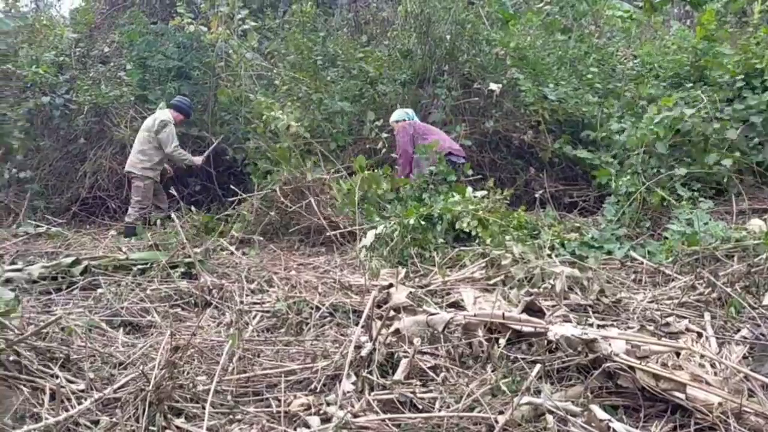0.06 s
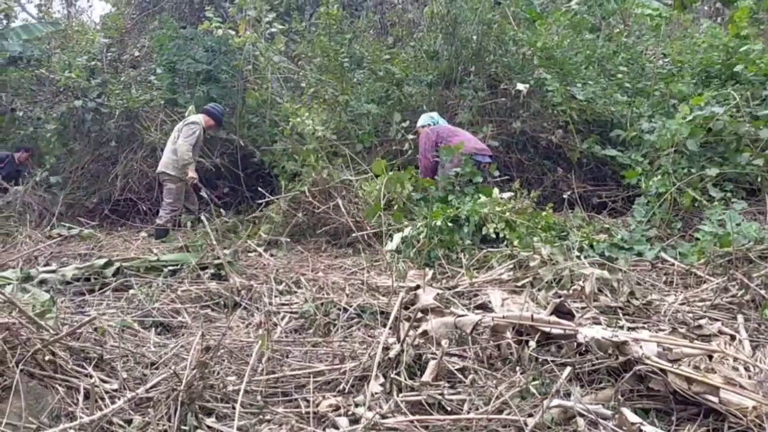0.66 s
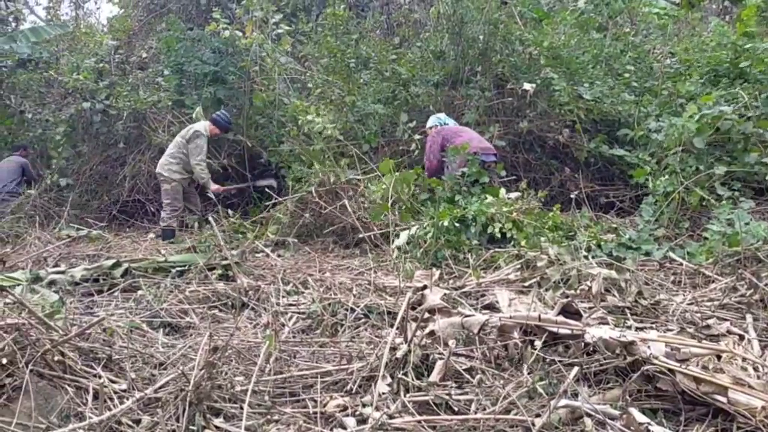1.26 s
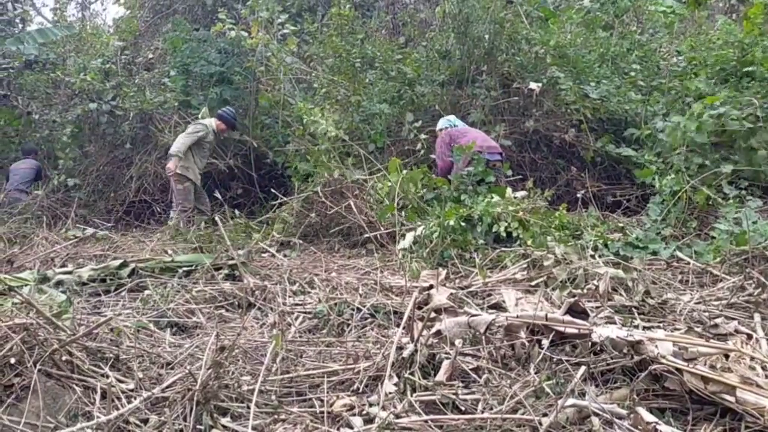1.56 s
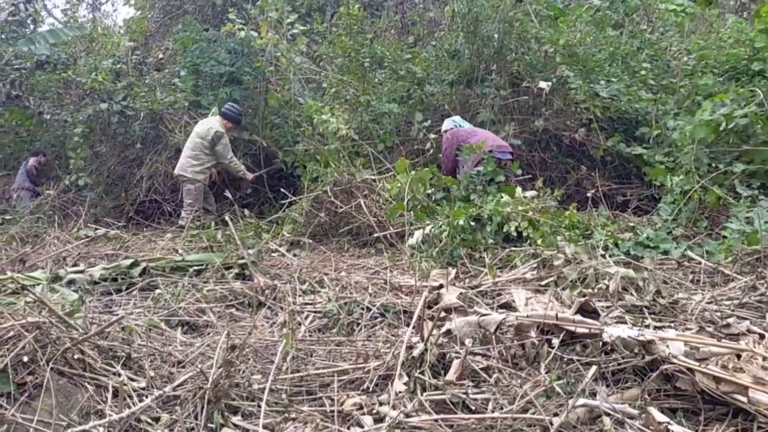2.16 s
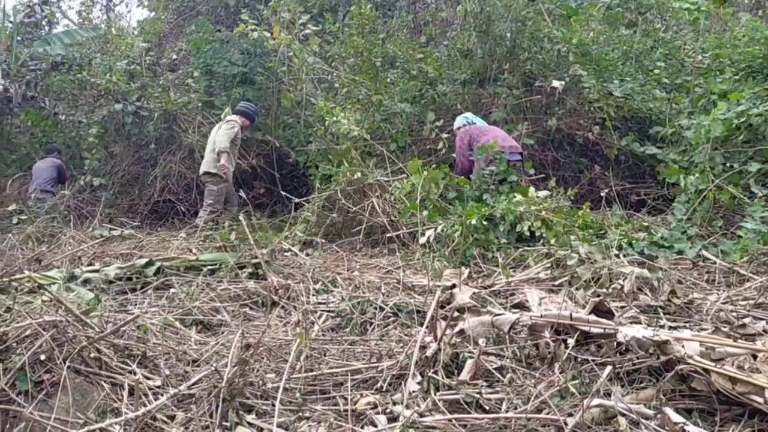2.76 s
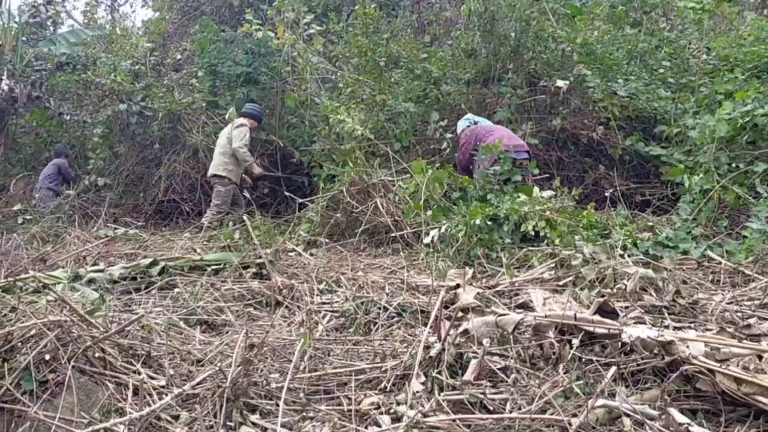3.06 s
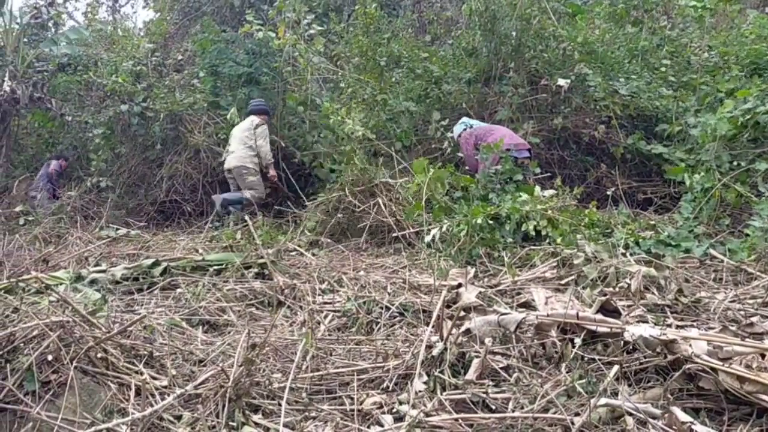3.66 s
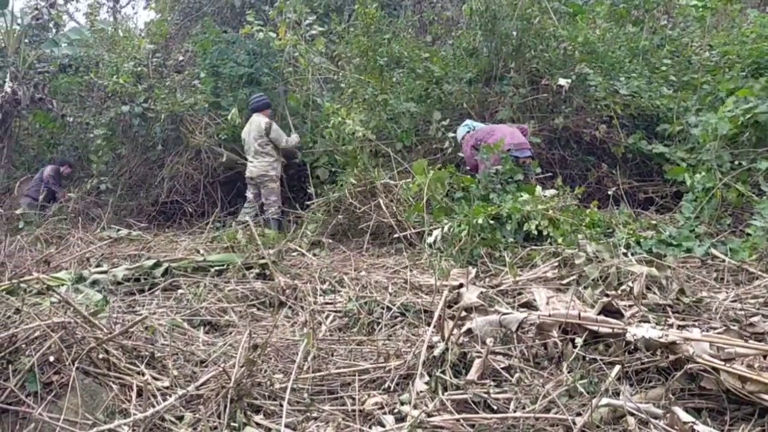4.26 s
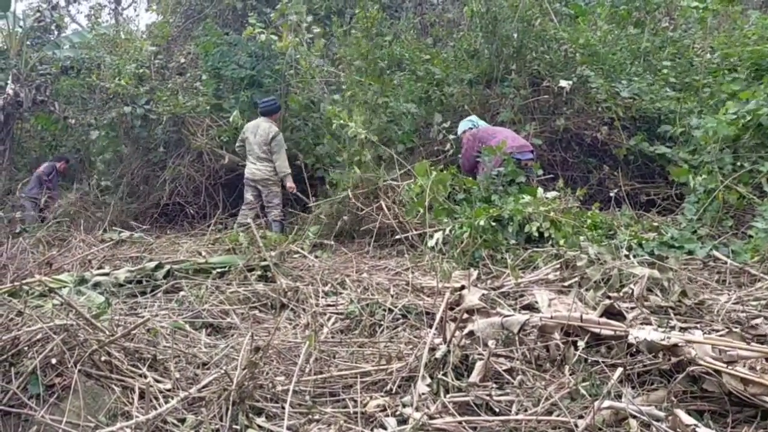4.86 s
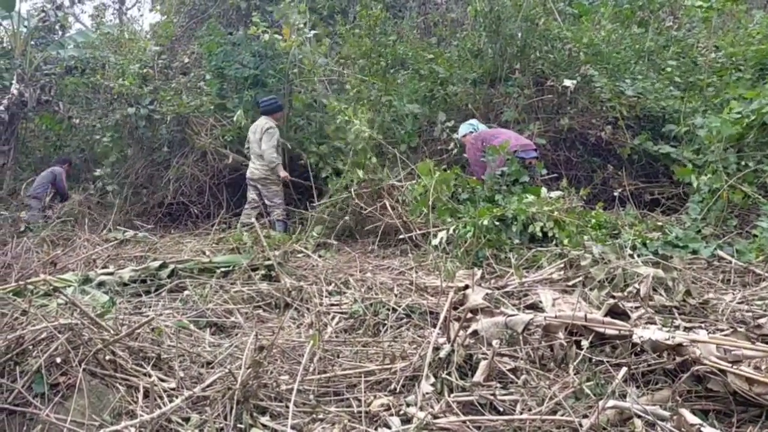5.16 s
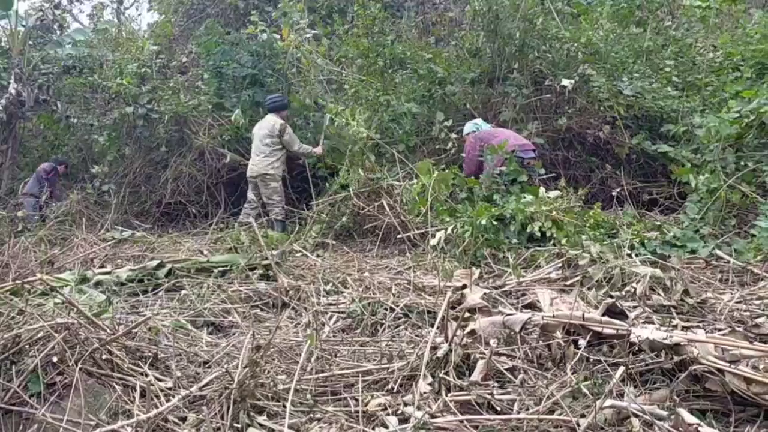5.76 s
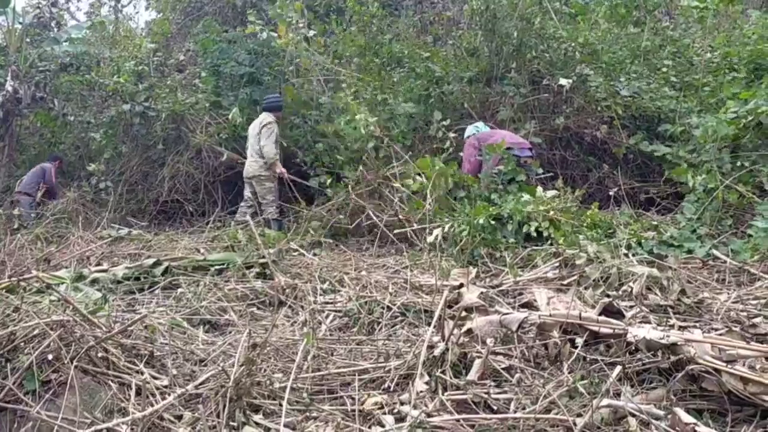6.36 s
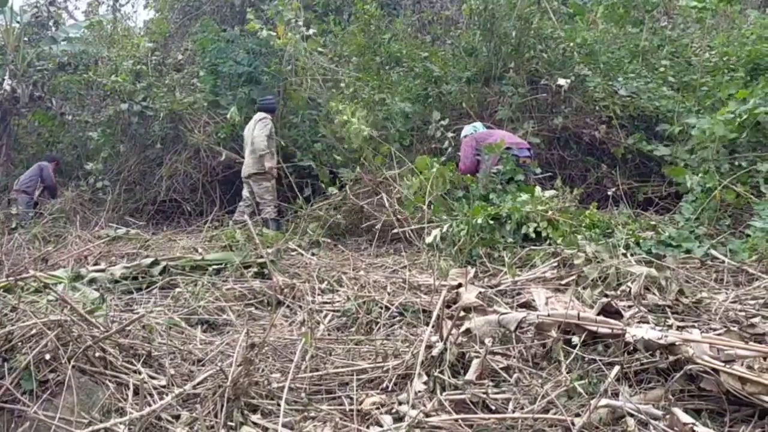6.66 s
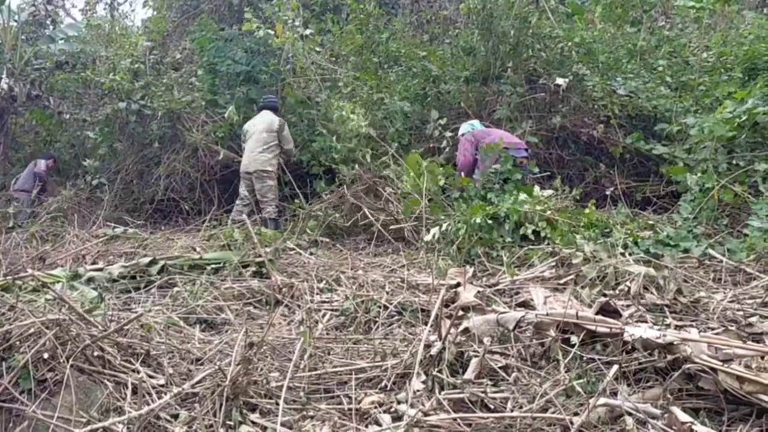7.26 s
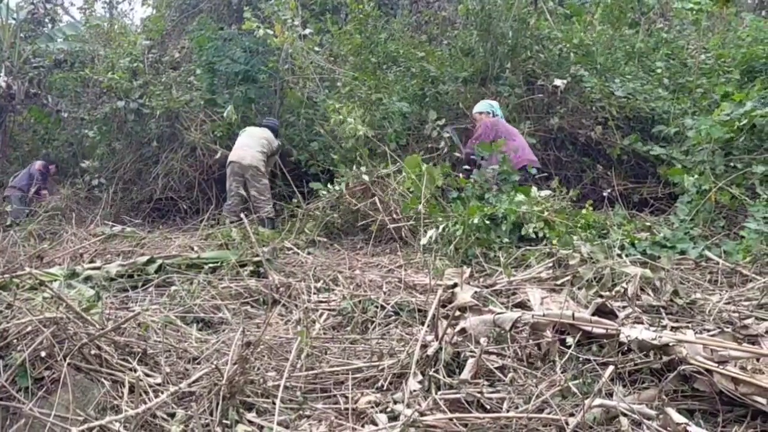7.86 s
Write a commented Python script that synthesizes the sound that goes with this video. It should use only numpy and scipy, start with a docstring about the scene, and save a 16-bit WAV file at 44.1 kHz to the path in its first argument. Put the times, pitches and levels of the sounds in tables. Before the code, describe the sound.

People clear brush with hand blades some metres away on a wooded slope. Irregular strokes knock into woody stems and tear through leaves, with sharp twig snaps and the rustle of dragged branches between them. A light gust passes early, and a bird gives one brief whistle. In the last third, stronger wind rumbles and thumps on the microphone while the chopping continues.

```python
"""People clear a hillside with hand blades, some metres away. From the start, swings knock into woody
stems and tear through leaves; twigs snap, cut brush is dragged aside, and the wooded slope echoes faintly.
A light gust passes at 1.2 s. At 3 s a bird whistles once. From 5.6 s stronger gusts buffet the microphone
as the work goes on. The microphone overloads on the hardest blows."""
import sys
import numpy as np
from scipy import signal
from scipy.fft import rfft, irfft, next_fast_len
from scipy.io import wavfile

SR = 44100
rng = np.random.default_rng(int(sys.argv[2]) if len(sys.argv) > 2 else 0)


def persist_wave(psi):
    """Save psi, clipped to +-1, as 16-bit WAV."""
    counts = np.round(np.clip(psi, -1, 1) * 32767).astype(np.int16)
    wavfile.write(sys.argv[1], SR, np.atleast_2d(counts).T)


N = 353682
TIME = np.arange(N) / SR

# Spectra of cracking wood and dry leaves. Each row: frequency in Hz, density in dB.
WOOD_SPECTRUM = [(40, -20), (170, -9), (300, -18.5), (450, -19.5), (600, -11), (850, -11.5), (1200, -6),
                 (1550, -3.5), (1790, 1.5), (2000, 0), (2230, -0.5), (2800, -9), (5000, -17.5),
                 (16000, -33.5)]
LEAF_SPECTRUM = [(100, -11.5), (600, -18), (1500, -19), (3500, 1.5), (8000, -3), (16000, 1)]


def strokes(settle_db=-14, settle_db_per_s=65, notch_hz=4100, sheen_octaves=0.36):
    """Fibres tear while the blade passes; then the shaken bush settles."""
    # Each row: start in seconds, stem level in dB, leaves re stems in dB, rise in seconds,
    # length in seconds, foliage sheen in Hz, its boost in dB, ground bounce from 0 to 1.
    cuts = [(.004, -34.5, 9, 0.0024, 0.004, 13000, 12, 0.3), (.108, -22, 4.5, .0025, 0.0043, 11000, -3, 0),
            (.138, -24.5, 6, 0.0076, 0.014, 9000, -2, 0.23), (.433, -18.5, 1, 0.0076, 0.024, 13000, 1.5, 0),
            (1.408, -22.5, 2, 0.0038, 0.014, 13000, -2, 0), (1.427, -18, -1, 0.0018, 0.018, 14200, 6, 0.1),
            (1.583, -26.5, -1, 0.0039, 0.0078, 7000, 0, .83),
            (1.596, -25, 4.5, .006, 0.048, 7000, -3, 0.54), (1.857, -19.5, -6.5, 0.019, 0.026, 8000, 7, 0),
            (1.881, -14, 0.5, 0.007, 0.013, 7100, 3, 0), (2.414, -14.5, -2.5, 0.013, 0.055, 13000, 5, 0),
            (2.78, -37, -7.5, 0.064, 0.13, 7100, 8.5, 0.68), (3.223, -17.5, 2, .003, 0.027, 4500, 1, 0.1),
            (3.347, -31.5, 9.5, 0.0066, .018, 7600, -1.5, 0.2), (3.428, -22, -1, 0.0032, .018, 5800, -2, 0),
            (3.443, -26, -3, .005, .032, 14900, 11.5, .03),
            (4.253, -16.5, -5, 0.0084, 0.031, 7000, 1.5, 0.31), (4.67, -22.5, -1, 0.011, 0.09, 15500, 5, 0),
            (4.775, -25.5, 0, 0.0034, 0.091, 15000, 3, 0),
            (5.221, -17.5, -1.5, 0.0036, 0.018, 14000, 4, 0.1),
            (5.996, -22.5, 3.5, 0.0049, 0.11, 15000, 7.5, .1),
            (6.335, -18.5, 3, 0.0055, 0.016, 6760, -1, 0.62),
            (6.954, -21.5, -5.5, .011, 0.022, 15000, 1, .16), (7.31, -42.5, 3, .024, 0.12, 7100, 1.5, 0.68),
            (7.952, -41, 17.5, .0085, .017, 15000, 7, .1)]
    # Thick stalks that only low cuts reach. Each row: centre in Hz, width in octaves, dB at bounce 1.
    stalks = [(776, 0.9, 10.5), (2570, 0.18, 18), (5900, 0.082, 14)]
    clumps = unit(amp(2 * wander(rate_hz=110)))
    stems = amp(-3.5) * colour(clumps * crackle(per_s=1800, spread_db=3, hiss_db=-1), WOOD_SPECTRUM)
    leaves = amp(-1.5) * colour(clumps * crackle(per_s=6000, spread_db=4.5, hiss_db=2.5), LEAF_SPECTRUM)
    out = np.zeros(N)
    t = np.arange(SR) / SR
    for start_s, db, leaf_db, rise_s, length_s, sheen_hz, sheen_db, bounce in cuts:
        after_s = np.maximum(t - length_s, 0)
        fade_db_per_s = 198 * (0.025 / length_s) ** 0.37  # longer cuts shake more brush, die more slowly
        settling = amp(settle_db - settle_db_per_s * after_s)
        envelope = np.minimum(t / rise_s, 1) * np.hypot(amp(-fade_db_per_s * after_s), settling)
        span = (round(start_s * SR) + np.arange(SR)) % N
        tear = stems[span] + amp(leaf_db) * leaves[span]
        tear = tint(tear, lambda f: amp(sheen_db * hump(f, sheen_hz, sheen_octaves)))
        # the delayed ground bounce hollows the upper middle
        tear = tint(tear, lambda f: (1 + bounce * np.exp(-1j * np.pi * f / notch_hz)) / np.hypot(1, bounce))
        tear = tint(tear, lambda f: amp(bounce * sum(boost_db * hump(f, hz, octaves)
                                                     for hz, octaves, boost_db in stalks)))
        add(out, start_s, amp(db) * envelope * tear)
    return out


def chops(contact_s=0.00066, graze_db=-13, graze_s=0.0016):
    """A blow swells over the contact time and rings a thick stem's damped modes; the edge grazes bark."""
    # Each row: start in seconds, relative level in dB, stem pitch in Hz, t60 in seconds.
    blows = [(0.111, -2.5, 1625, 0.018), (0.113, 0, 2160, 0.018), (0.143, -11.5, 1856, 0.045),
             (0.439, -2, 1640, 0.0097), (0.451, -11, 1800, 0.029), (0.464, -13, 1734, 0.077),
             (0.501, -11, 1740, 0.03), (0.918, -17.5, 1890, 0.036), (1.426, -16, 1374, 0.045),
             (1.436, -2.5, 1230, 0.01), (1.605, -12, 2040, 0.08), (1.863, -14, 1850, 0.094),
             (1.882, -8.5, 1740, 0.034), (2.354, -20, 1247, 0.061), (2.356, -15.5, 2110, 0.035),
             (2.419, -12.5, 2165, 0.12), (2.443, -10.5, 1710, 0.039), (3.228, 4, 1838, 0.023),
             (3.357, -16, 1820, 0.03), (3.456, -15, 1690, 0.088), (3.46, -23, 716, 0.074),
             (4.264, -21, 2170, .028), (4.701, -12, 2090, 0.028), (4.704, -4.5, 1130, 0.0075),
             (5.22, -11, 2110, 0.02), (5.486, -33, 1803, 0.2), (5.523, -26.5, 1770, 0.051),
             (5.978, -6.5, 2100, 0.017), (6.338, -12, 2445, 0.014), (7.722, -31, 1840, 0.096)]
    # Each row: nominal multiple of the pitch, level in dB, factor on t60.
    stem_modes = [(.6, -17, 0.88), (.75, -15.5, 0.83), (0.999, -1.5, 1), (1.016, -23.5, 6.3),
                  (1.2, -25, 0.6), (1.55, -9, 0.38), (2.25, -11, 0.33)]
    rings, bark = np.zeros((2, N))
    t = np.arange(SR // 4) / SR
    for start_s, db, hz, t60_s in blows:
        stretch = rng.uniform(.88, 1.12)  # no two stems space their modes alike
        ring = np.zeros(len(t))
        for ratio, mode_db, t60_factor in stem_modes:
            decay = amp(mode_db - 60 * t / (t60_s * t60_factor))
            ring += decay * np.sin(2 * np.pi * (hz * ratio ** stretch * t + rng.random()))
        blow = amp(db + 3.5) * (1 - np.exp(-t / contact_s))
        graze = amp(graze_db) * np.exp(-t / graze_s) * rng.standard_normal(len(t))
        add(rings, start_s, blow * ring)
        add(bark, start_s, blow * graze)
    return rings + colour(bark, WOOD_SPECTRUM)


def snaps(rise_s=0.00091, split_s=0.0014, scatter_db=-19, scatter_s=0.022, skirt_db=-6):
    """A twig splits in milliseconds, shriller the thinner it is; nearby stems scatter the crack."""
    # Each row: start in seconds, relative crack level in dB, pitch in Hz, wood re crack in dB.
    twigs = [(0.0595, -19.5, 10700, -15), (0.114, -3, 10600, -19), (0.124, -16, 14200, -16.5),
             (0.1534, -3, 9300, -20), (0.453, -3, 12100, -1), (0.5, -15.5, 10600, 4),
             (0.5938, -15, 8400, -16), (0.648, -18.5, 12200, -25), (0.704, -22, 7760, -46),
             (1.256, -23.5, 11700, 4.5), (1.328, -16.5, 11500, -10), (1.428, -12, 5400, -18),
             (1.4441, -5, 13100, -24), (1.885, -0.5, 7560, -12), (3.206, -20.5, 12500, -6),
             (3.227, -5.5, 4250, -30), (3.268, -18, 6900, -10), (3.357, -5, 7750, -28),
             (3.504, -19, 13000, 5.5), (3.952, -26.5, 11800, -15), (4.0754, -20, 12200, -2.5),
             (4.173, -17.5, 9400, -1.5), (4.3616, -15, 8640, -15), (4.4301, -8.5, 12200, -22),
             (4.476, -9.5, 11700, -25), (4.5055, -10.5, 9200, -22), (4.655, -26, 10000, 11),
             (4.7003, -14, 10800, 5.5), (4.7408, -16.5, 11600, 3), (4.7786, 1, 11900, -22),
             (4.782, -10, 12500, -3), (5.0285, -22, 9700, -12), (5.187, -16.5, 9550, -11),
             (5.2186, -22, 3800, 14.5), (5.368, -40, 5000, 14), (5.933, -30, 5000, 11),
             (5.9776, -27, 9000, 9), (6.0054, -5, 10700, -3.5), (6.061, -10, 11300, -4),
             (6.09, -4, 10900, -24), (6.119, -1, 14200, -30), (6.156, -2.5, 11300, -14),
             (6.2517, -24, 7900, 4.5), (6.3733, -4.5, 8500, -7), (6.3904, -1.5, 7340, -24),
             (6.96, -3, 11700, -22), (7.109, -21.5, 10400, -2), (7.552, -36.5, 5400, -13),
             (7.6186, -48, 5530, 17), (7.963, -14, 12000, -18)]
    wood, cracks = np.zeros((2, N))
    t = np.arange(SR // 10) / SR
    envelope = np.minimum(t / rise_s, 1) * (np.exp(-t / split_s) + amp(scatter_db) * np.exp(-t / scatter_s))
    for start_s, db, hz, wood_db in twigs:
        fibres = rng.standard_normal(len(t))
        crack = envelope * unit(tint(fibres, lambda f: amp(skirt_db) + hump(f, hz, octaves=0.41)))
        crack *= np.linalg.norm(envelope) / np.linalg.norm(crack)
        gain = amp(db + 2.5)
        add(wood, start_s, gain * amp(wood_db) * envelope * fibres)
        add(cracks, start_s, gain * crack)
    return colour(wood, WOOD_SPECTRUM) + colour(cracks, LEAF_SPECTRUM)


def rustle(ring_db=-10.5):
    """Dragged or trodden branches scrape, ring and crackle in clumps; a few dry sticks crack."""
    # Each row: start and length in seconds, relative stem level in dB, leaf offset in dB, pitch in Hz.
    pulls = [(0, 0.075, -34.5, -12, 2120), (.21, 0.058, -28.5, 5.5, 1890), (0.497, 0.81, -38, 3.5, 1840),
             (0.89, 0.071, -39, 10.5, 1830), (1.473, 0.3, -31.5, 1.5, 2100), (2.0, 0.38, -37.5, 2.5, 1980),
             (2.607, 0.29, -37, 4, 2230), (3.49, 0.049, -27.5, 6.5, 2070), (3.665, 0.78, -45.5, 7.5, 1950),
             (4.051, 0.35, -34, 6, 2200), (4.267, 0.32, -27, 7, 2110), (4.624, .2, -29.5, -6, 1780),
             (4.952, 0.25, -33, 1, 2230), (5.47, 0.17, -40.5, 3, 1840), (5.65, 0.42, -35.5, 6, 1800),
             (5.905, 0.18, -26.5, 1.5, 2110), (6.23, 0.25, -37, 2, 2110), (6.71, 0.25, -40, 3, 2180),
             (6.893, 0.13, -30, 4.5, 2000), (7.263, 0.11, -36, 1, 2180), (7.73, 0.16, -40, 5.5, 1900),
             (7.863, 0.062, -25.5, 5, 1880)]
    clumps = unit(amp(1.63 * wander(rate_hz=24)))
    sticks = crackle(per_s=45, spread_db=2.5, hiss_db=-35)
    stems = clumps * crackle(per_s=900, spread_db=0.5, hiss_db=5.5) + amp(-9) * sticks
    leaves = clumps * crackle(per_s=3000, spread_db=-2, hiss_db=-3) + amp(-13.5) * sticks
    scrape = crackle(per_s=580, spread_db=2, hiss_db=-1.5)
    stem_power, leaf_power = amp(-43) ** 2, amp(-53) ** 2  # the brush never quite rests
    rings = np.zeros(N)
    for start_s, length_s, db, leaf_db, hz in pulls:
        pull = amp(db) * swell(start_s, length_s, rise_s=0.044, fall_db_per_s=90)
        stem_power += pull ** 2
        leaf_power += (amp(leaf_db) * pull) ** 2
        rings += amp(ring_db) * pull * resonate(scrape, hz, width_hz=170)
    stems = amp(-3) * np.sqrt(stem_power) * colour(stems, WOOD_SPECTRUM)
    leaves = amp(-6) * np.sqrt(leaf_power) * colour(leaves, LEAF_SPECTRUM)
    return rings + stems + leaves


def wind(breeze_db=-52):
    """Eddies at the microphone: a rumble that swells in gusts, with harder buffets in strong ones."""
    # Each row: start and length in seconds, relative level in dB, buffet offset in dB.
    gusts = [(1.2, 0.76, -33.5, -21), (5.64, 0.12, -32.5, -32), (5.784, 0.54, -23.5, -21),
             (5.998, 0.075, -15, -14), (6.445, 1.073, -21.5, -18), (6.878, 0.28, -15, -3),
             (7.707, 0.35, -20.5, -22)]
    # Each row of both: frequency in Hz, density in dB.
    rumble_spectrum = [(10, -1.5), (25, -3), (50, 0.5), (85, -3.5), (125, -12), (200, -23), (400, -83),
                       (900, -74)]
    buffet_spectrum = [(40, -10), (100, -5.5), (160, 3), (220, -2), (350, -14.5), (600, -36), (1500, -65)]
    rumble, buffets = noise(rumble_spectrum), noise(buffet_spectrum)
    turbulence = unit(amp(3.7 * wander(rate_hz=25)))
    out = amp(breeze_db + 1.7 * wander(rate_hz=2.4)) * rumble
    for start_s, length_s, db, buffet_db in gusts:
        gust = amp(db) * swell(start_s, length_s, rise_s=0.025, fall_db_per_s=226)
        out += gust * turbulence * (amp(-1.9) * rumble + amp(buffet_db - 6.5) * buffets)
    return out


def thumps(width_cycles=0.43):
    """A single eddy slaps the microphone: one short push and pull of pressure."""
    # Each row: centre in seconds, peak in dB, pitch in Hz.
    eddies = [(1.512, -19, 124), (1.635, -18, 50), (1.898, -19, 80), (5.831, -16, 70), (6.26, -8.5, 50.4),
              (6.499, -8, 41.5), (6.929, -9, 173), (7.121, -7, 120), (7.154, -1.5, 128), (7.407, -14, 101),
              (7.997, -6, 47)]
    out = np.zeros(N)
    for centre_s, db, hz in eddies:
        cycles = (TIME - centre_s) * hz
        envelope = np.exp(-np.minimum((cycles / width_cycles) ** 2, 50))
        out += amp(db) * envelope * np.cos(2 * np.pi * cycles)
    return out


def bird():
    """One pure, gliding whistle from the trees."""
    # Each row: time in seconds, pitch in Hz, level in dB.
    contour = [(3.0, 2700, -56), (3.045, 3000, -42), (3.068, 2950, -44), (3.088, 2200, -36.5),
               (3.115, 2110, -52), (3.15, 2560, -29), (3.161, 3050, -50), (3.184, 3600, -42),
               (3.22, 3650, -51)]
    times_s, hz, db = np.transpose(contour)
    t = np.arange(times_s[0], times_s[-1], 1 / SR)
    tone = np.sin(2 * np.pi * np.cumsum(np.interp(t, times_s, hz)) / SR)
    envelope = amp(np.interp(t, times_s, db)) * signal.windows.tukey(len(t), .1)
    out = np.zeros(N)
    add(out, times_s[0], envelope * tone)
    return out


def slope_echo(x, build_s=0.029):
    """Trunks and foliage return a diffuse echo that builds up and dies by band."""
    # Each row: frequency in Hz, t60 in seconds.
    decay_times = [(100, 0.82), (1000, 0.9), (2000, 0.49), (8000, 0.51), (16000, 0.32)]
    hz, t, bands = signal.stft(rng.standard_normal(SR), SR, nperseg=256)
    bands *= amp(-60 * t / lookup(decay_times, hz)[:, None]) * (1 - np.exp(-t / build_s))
    tail = signal.istft(bands, SR, nperseg=256)[1]
    return signal.oaconvolve(x, tail / np.linalg.norm(tail))[:N]


def still_air(level_db=-40.5):
    """A faint, steady outdoor hush."""
    # Each row: frequency in Hz, density in dB.
    air_spectrum = [(25, 15), (45, -8), (80, -16), (150, -10.5), (250, -10), (340, -7.5), (450, -10.5),
                    (800, -14), (1450, -17.5), (1850, -16), (2250, -8.5), (3000, -21.5), (16000, -21.5)]
    return amp(level_db) * noise(air_spectrum)


def amp(db):
    """Decibels to gain."""
    return 10 ** (np.asarray(db) / 20)


def unit(x):
    """Scales to rms 1."""
    return x / np.sqrt(np.mean(x ** 2) + 1e-20)


def lookup(points, hz):
    """Interpolates a table over log frequency."""
    f, value = np.transpose(points)
    return np.interp(np.log(hz + 1), np.log(f + 1), value)


def add(mix, start_s, sound):
    """Mixes a sound in at start_s."""
    part = mix[max(round(start_s * SR), 0):][:len(sound)]
    part += sound[:len(part)]


def colour(x, spectrum, keep_power=True, size=4096):
    """Minimum-phase filter with the given spectrum."""
    log_gain = np.log(amp(lookup(spectrum, abs(np.fft.fftfreq(size, 1 / SR)))))
    taps = np.fft.ifft(np.exp(signal.hilbert(log_gain).conj())).real[:size // 2]
    return signal.oaconvolve(x, taps / np.linalg.norm(taps) if keep_power else taps)[:N]


def tint(x, gain):
    """Filters by gain(Hz)."""
    return irfft(rfft(x) * gain(np.fft.rfftfreq(len(x), 1 / SR) + 1), len(x))


def hump(f, hz, octaves):
    """A bell around hz, peak 1."""
    return np.exp(-.5 * (np.log2(f / hz) / octaves) ** 2)


def resonate(x, hz, width_hz):
    """One steep resonance, rms 1."""
    b, a = signal.iirpeak(hz, hz / width_hz, SR)
    return unit(signal.lfilter(b, a, signal.lfilter(b, a, x)))


def noise(spectrum):
    """Steady coloured noise, rms 1."""
    return unit(tint(rng.standard_normal(next_fast_len(N)), lambda f: amp(lookup(spectrum, f)))[:N])


def wander(rate_hz):
    """Random drift below rate_hz, rms 1."""
    return unit(tint(rng.standard_normal(next_fast_len(N)), lambda f: 1 / (1 + (f / rate_hz) ** 4))[:N])


def crackle(per_s, spread_db, hiss_db):
    """Tiny fractures of unequal size over a hiss of rubbing, rms 1."""
    size = amp(spread_db * np.minimum(rng.exponential(1, N), 4))
    clicks = size * rng.choice([-1, 1], N) * (rng.random(N) < per_s / SR)
    return unit(unit(clicks) + amp(hiss_db) * rng.standard_normal(N))


def swell(start_s, length_s, rise_s, fall_db_per_s):
    """Envelope: rises, holds until length_s is over, dies away."""
    t = TIME - start_s
    return np.clip(t / rise_s, 0, 1) * amp(-fall_db_per_s * np.maximum(t - length_s, 0))


def scene():
    """Brush work, bird, their echo, air and wind, in mono."""
    work = strokes() + rustle() + snaps() + chops()
    whistle = bird()
    echo = slope_echo(amp(-17.5) * work + amp(-4) * whistle)
    return (work + whistle + echo + still_air() + wind() + thumps())[None]


def record(dry, cutoff_hz=15650):
    """The microphone port ripples the treble; the loudest peaks clip; a low-pass follows."""
    # Each row: frequency in Hz, gain in dB.
    port_response = [(4000, -0.5), (4900, .5), (5900, -3.5), (6500, 0.5), (6930, 4.5), (7500, 5.5),
                     (8250, 7), (9000, -5), (10200, 5.5), (11600, -.5), (12800, 1), (13900, 3),
                     (14600, -2.5), (15300, 5.5)]
    clipped = np.clip(colour(dry[0], port_response, keep_power=False), -1, 1)
    lowpass = signal.firwin(511, cutoff_hz, window=("kaiser", 8), fs=SR)
    return signal.oaconvolve(clipped, lowpass, "same")[None]


dry = scene()
out = record(dry)
persist_wave(out)
```